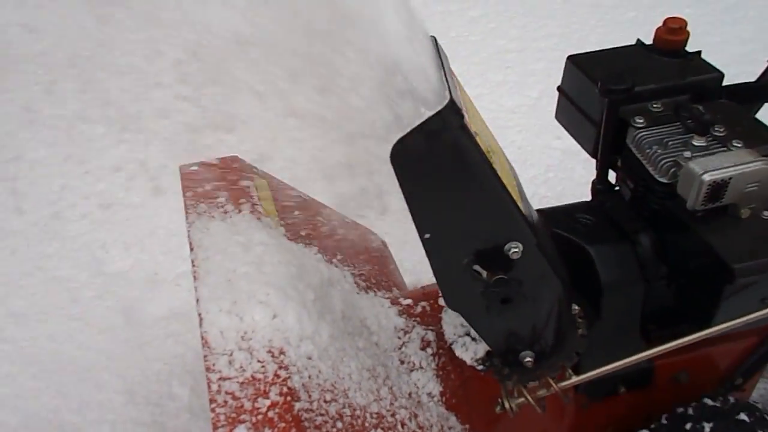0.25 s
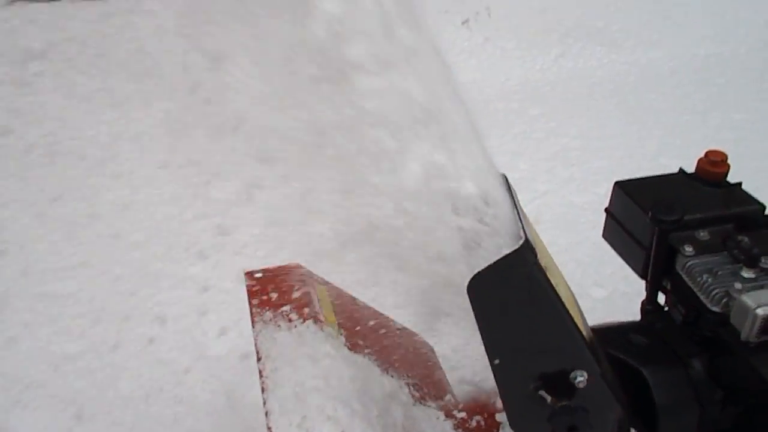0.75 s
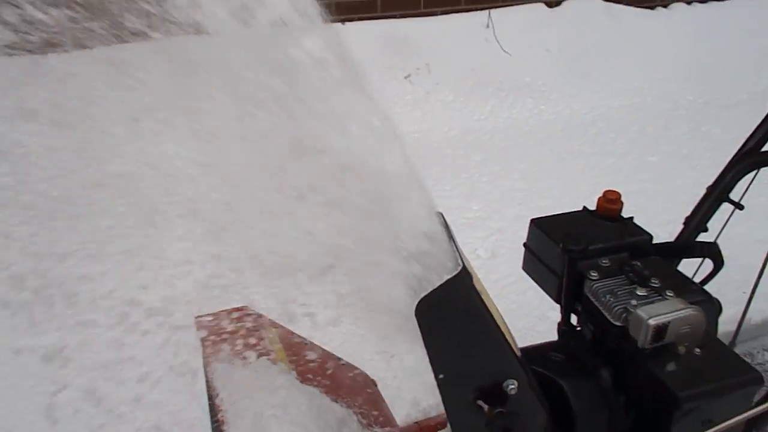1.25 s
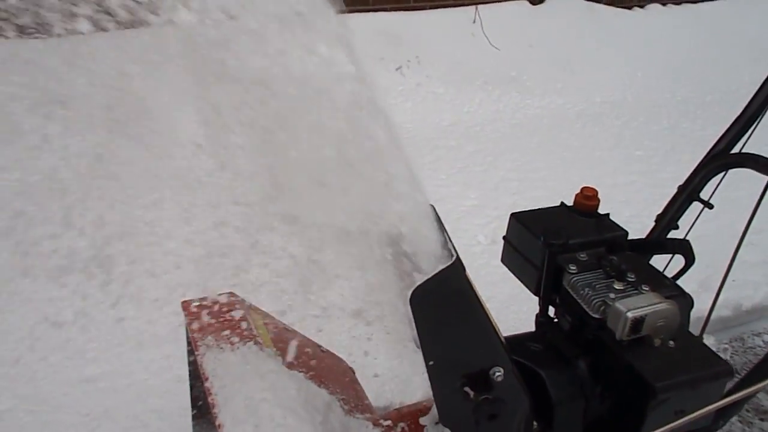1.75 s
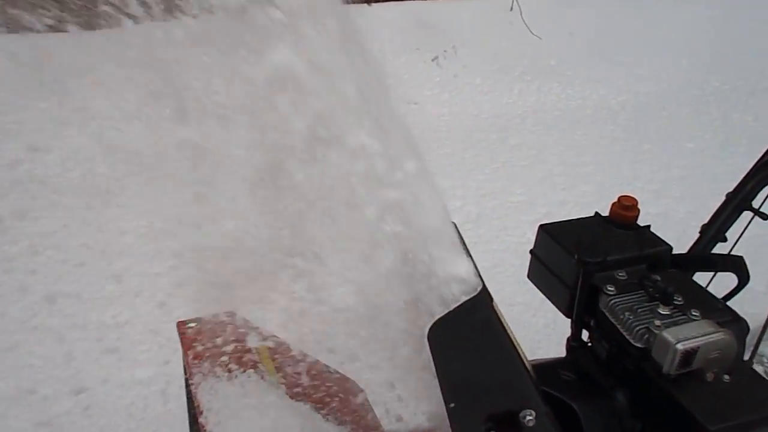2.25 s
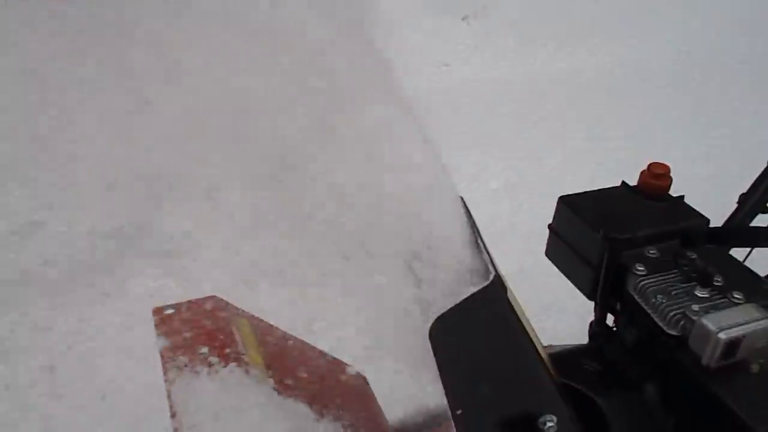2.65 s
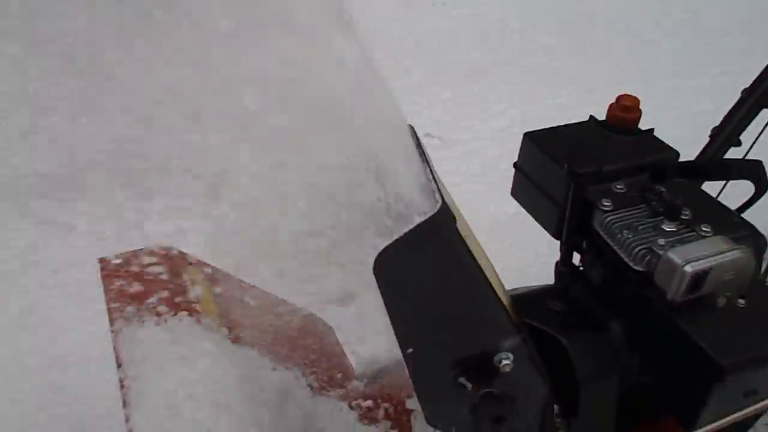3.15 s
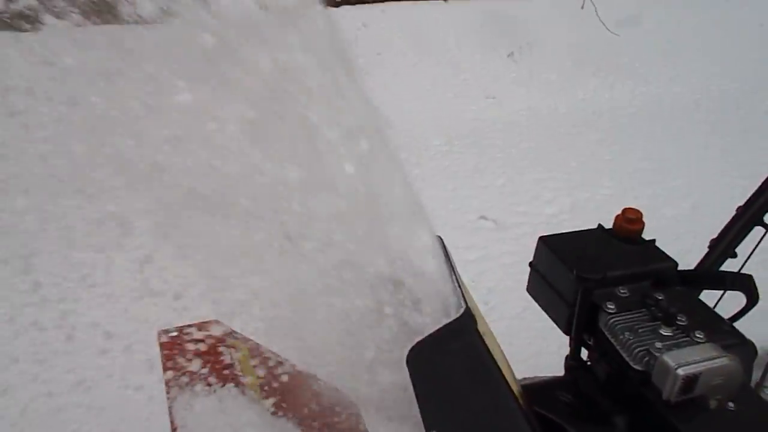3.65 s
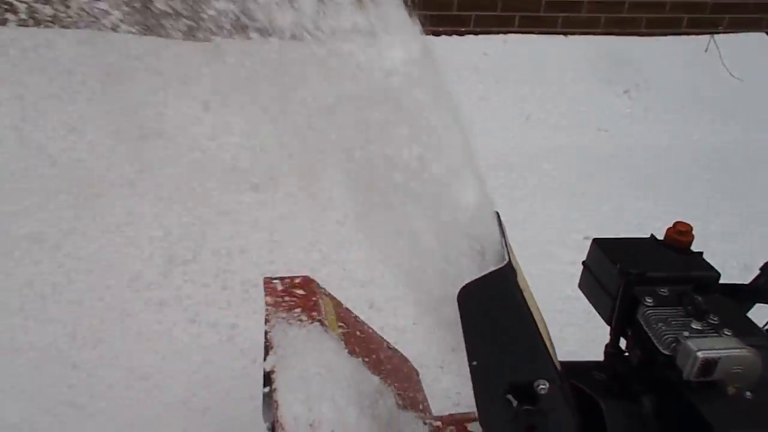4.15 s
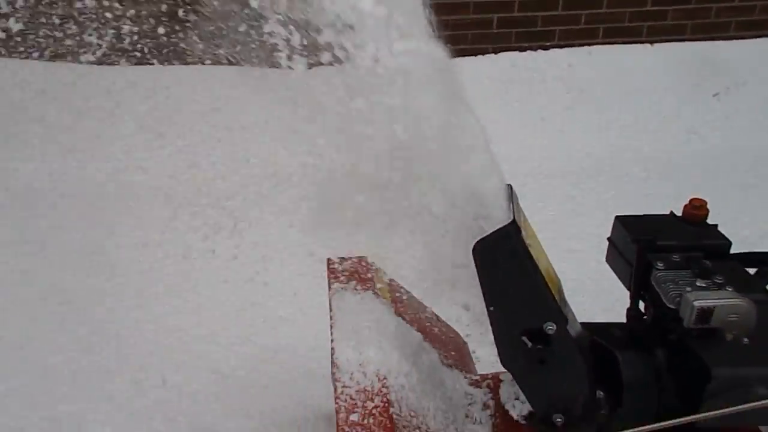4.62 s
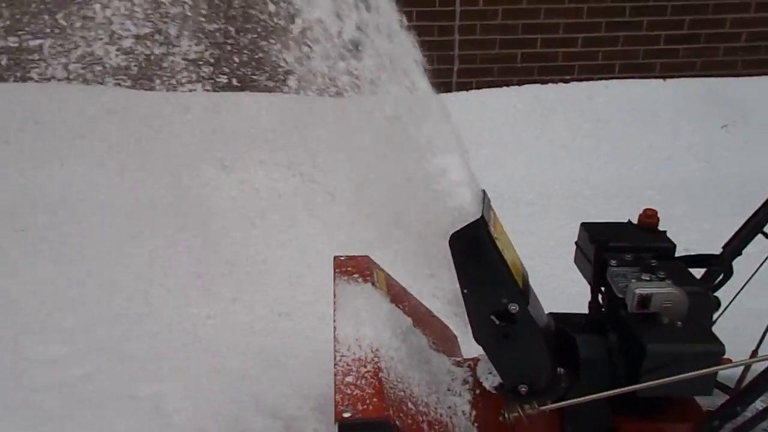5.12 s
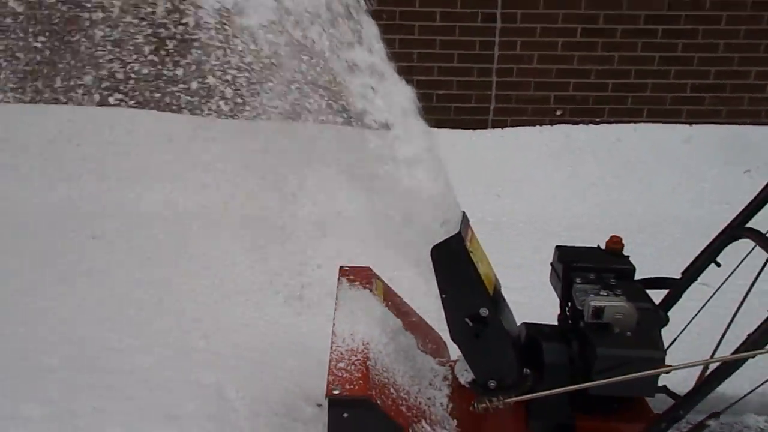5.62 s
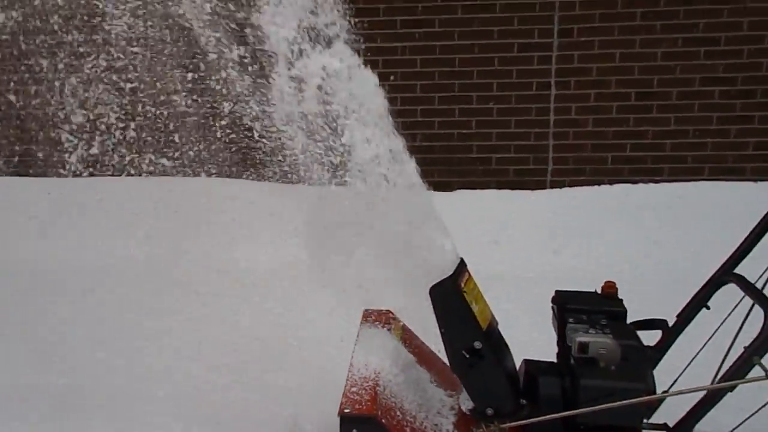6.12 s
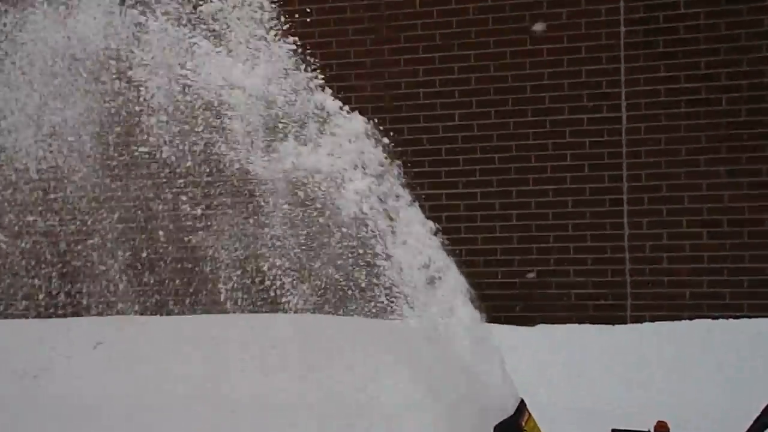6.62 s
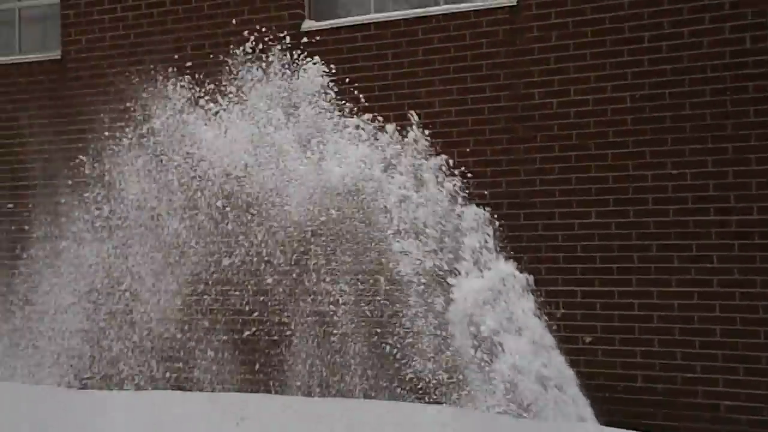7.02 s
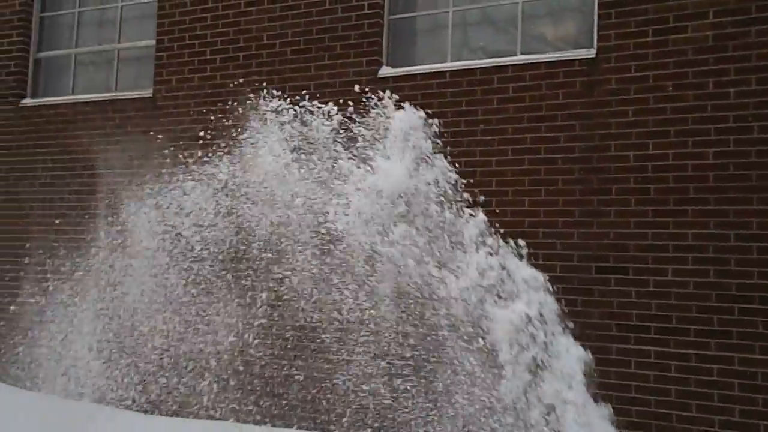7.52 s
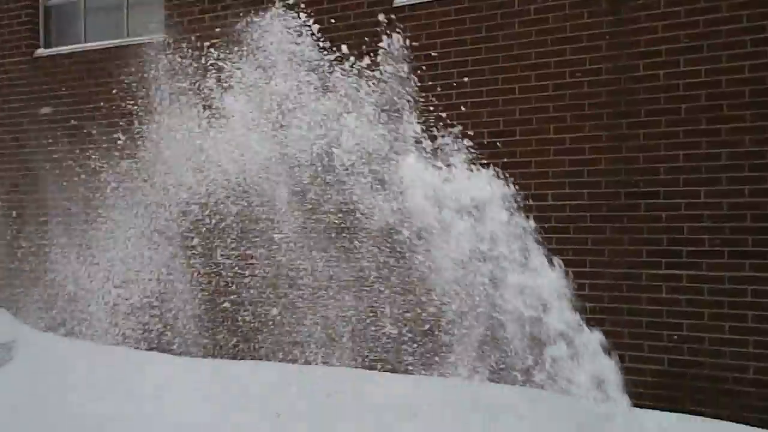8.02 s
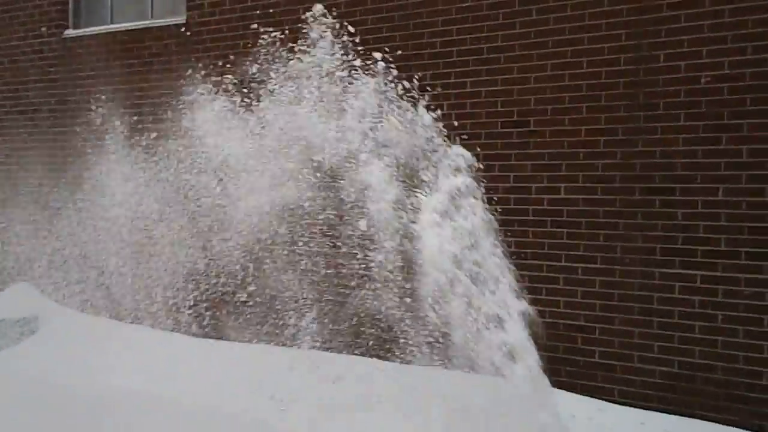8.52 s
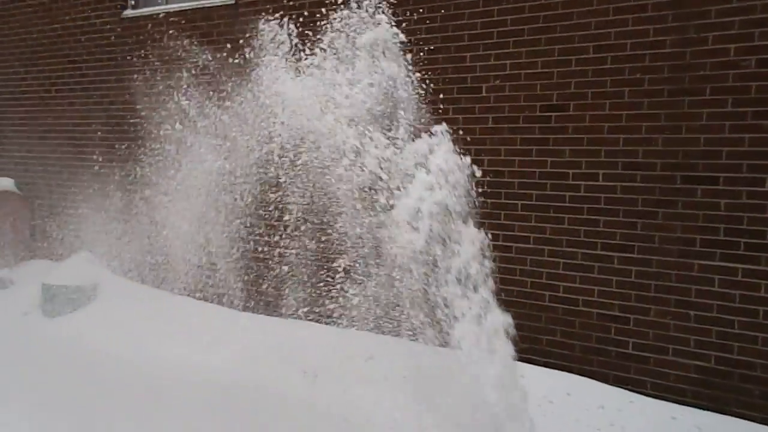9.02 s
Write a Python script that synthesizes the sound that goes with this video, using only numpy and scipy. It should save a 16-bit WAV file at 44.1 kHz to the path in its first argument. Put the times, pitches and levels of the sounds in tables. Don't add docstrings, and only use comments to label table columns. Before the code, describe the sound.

From 0 s a snow thrower runs at full work a step or two away outdoors. Its single-cylinder engine beats about 25 times a second, too fast to count, a rattling buzz-like chug of exhaust thumps, valve raps and metal clatter, with a sharp crack at each firing. Low rumble, faint blade thuds and a grainy snow hiss lie beneath. Irregular harder firings distort slightly and duck the level, which creeps back. Around 3 s the cracks bite more; near 3.5 s the engine swells briefly. From 4 to 6.5 s the exhaust gets fuller and boomier, with a short wall echo. Lumps knock the chute at about 5.3 s and 6.6 s. Around 6.8 s the listener faces the wall: sound brightens, coloured by reflections, and snow rush surges near 7.2 s. Strong cracks hit at 7.3 and 7.6 s. Engine and hiss continue, a little softer, to the cut at about 9.3 s.

```python
import sys
import numpy as np
from scipy import signal
from scipy.fft import rfft, irfft
from scipy.io import wavfile

SR = 44100
rng = np.random.default_rng(int(sys.argv[2]) if len(sys.argv) > 2 else 0)


def voltage_ratio(level):
    return 10 ** (np.asarray(level, float) / 20)


def wav_record(signal):
    frames = np.transpose(np.atleast_2d(signal))
    bounded = np.clip(frames, -1, 1)
    quanta = np.round(bounded * 32767).astype(np.int16)
    wavfile.write(sys.argv[1], SR, quanta)


N = 408366


def rms_one(x):
    return x / np.sqrt(np.mean(x ** 2) + 1e-20)


def in_time(rows):
    s, *columns = np.transpose(rows)
    return [np.interp(np.arange(N) / SR, s, column) for column in columns]


def at_times(times, curve):
    return np.interp(times * SR, np.arange(N), curve)


def clicks(times, sizes):
    at = np.round(np.asarray(times) * SR).astype(int)
    inside = (at >= 0) & (at < N)
    return np.bincount(at[inside], np.asarray(sizes)[inside], N) + 1e-18


def ring(x, hz, t60_s):
    r = voltage_ratio(-60 / (t60_s * SR))
    w = 2 * np.pi * hz / SR
    return signal.lfilter([0, np.sin(w)], [1, -2 * r * np.cos(w), r * r], x)


def resonator(hz, width):
    r = np.exp(-np.pi * width / SR)
    w = 2 * np.pi * hz / SR
    return [(1 - r * r) / 2, 0, (r * r - 1) / 2], [1, -2 * r * np.cos(w), r * r]


def resonance(x, hz, width):
    return signal.lfilter(*resonator(hz, width), x)


def smooth(x, ms):
    r = np.exp(-1000 / (max(ms, .05) * SR))
    return signal.lfilter([1 - r], [1, -r], x)


def swell(x, rise_ms, fall_ms):
    envelope = smooth(smooth(x, rise_ms), fall_ms)
    envelope = np.roll(envelope, -int(rise_ms * SR / 1000))
    return envelope * (rise_ms + fall_ms) * SR / 600


def drift(ms):
    return rms_one(smooth(smooth(rng.standard_normal(N), ms), ms))


def coloured(spectrum):
    hz, db = np.transpose(spectrum)
    axis = np.log(np.fft.rfftfreq(N, 1 / SR) + 1)
    gain = voltage_ratio(np.interp(axis, np.log(hz), db))
    return rms_one(irfft(rfft(rng.standard_normal(N)) * gain, N))


def split(x, hz):
    middle = signal.sosfilt(signal.butter(2, hz, fs=SR, output="sos"), x)
    treble = signal.sosfilt(signal.butter(2, hz, "high", fs=SR, output="sos"), x)
    return middle, treble


# (t/s, lag behind an even beat/ms)
GOVERNOR_LAG = [(0, 0), (.85, 1), (1.4, 1), (2.23, .3), (2.6, -.55), (3.34, -1.05), (3.7, -.55),
                (4.72, -.85), (5, .2), (6.38, -.6), (7.4, .75), (8.04, -.6), (8.35, .45), (9.26, 2.4)]
# (t/s, gain lost/dB)
HARD_FIRINGS = [(.334, 8.5), (.373, 11), (.572, 6.5), (.69, 7), (1.402, 5.5), (2.073, 5.5), (2.113, 7),
                (2.271, 6.5), (2.547, 3.5), (2.823, 6.5), (2.902, 5.5), (3.021, 9.5), (3.139, 2.5),
                (3.258, 5), (3.574, 8), (3.772, 7.5), (3.811, 5), (3.93, 7.5), (4.088, 4), (4.128, 7.5),
                (4.641, 5.5), (4.799, 6), (4.919, 3), (5.354, 4), (6.46, 3.5), (7.014, 6.4), (7.528, 8.5),
                (7.962, 4.5), (8.912, 4.5), (9.111, 5.5)]


def firings():
    first_s, cycles_per_s = .05701, 25.3
    even = first_s + np.arange(-1, 236) / cycles_per_s
    times = even + np.interp(even, *np.transpose(GOVERNOR_LAG)) / 1000
    hard = np.zeros(len(times))
    nearest = [np.argmin(abs(times - s)) for s, db in HARD_FIRINGS]
    hard[nearest] = np.array(HARD_FIRINGS)[:, 1]
    return times, hard


def pulses(table, times, hard, behind, spread_db, jitter_ms, hard_share=0.043):
    out = np.zeros(N)
    moved = at_times(times, behind)
    for ms, hz, t60_ms, side, rear in table:
        chance = rng.standard_normal((len(times), 2))
        at = times + (ms + jitter_ms * chance[:, 1]) / 1000
        db = spread_db * chance[:, 0] + hard_share * hard * (abs(ms) < 2)
        push = side + (rear - side) * moved
        out += ring(clicks(at, push * voltage_ratio(db)), hz, t60_ms / 1000)
    return rms_one(smooth(out, .08))


# (t from firing/ms, f/Hz, t60/ms, push from the side, push from behind)
VALVE_RAPS = [(-18.5, 1190, 2.5, 7.5, -1), (-12, 1410, 14, .3, 4), (-10, 1560, 39, 0.45, -3.3),
              (-4, 2380, 3.8, 0.89, 7), (0.3, 1360, 2.7, 1.4, 1.5), (2.66, 1650, 9.6, 5.2, 5.5),
              (0.54, 2580, 6.2, 3, 4.5), (5.5, 2230, 33, 0.98, 4.5)]


def raps(times, hard, behind):
    return pulses(VALVE_RAPS, times, hard, behind, spread_db=2.4, jitter_ms=0.08)


BURST_TIMES = [-20.5, -13.5, -9.5, -4, .4, 9.2, 15]
# (rise/ms, fall/ms, middle level/dB, treble level/dB, level change between cycles/dB)
BURST_SHAPES = [
    (0.75, 3, -10, -8, 1),
    (0.96, 2.7, -2, -3.5, 1),
    (1.03, 2.5, -6.5, 1, 1.5),
    (0.9, 2.5, -4, -9, 1),
    (0.6, 1.25, 8.5, 12, .7),
    (1.6, 1.2, -4, .5, 3),
    (0.95, 1, -12, -14, 3),
]
# (f/Hz, level per Hz/dB)
NOISE_COLOUR = [(350, -14), (600, -9), (679, -5.5), (958, -9.5), (1100, -4.5), (1200, -8), (1630, -6),
                (1750, -6.5), (2160, -4.5), (3200, -4.5), (7040, -3), (9940, -9.5), (11400, -8.5),
                (14800, -49), (22000, -120)]
# (f/Hz, width/Hz, level/dB)
PANELS = [(1106, 11, 8), (1660, 9, 6.5), (2220, 40, 5), (4910, 840, 3.5), (8060, 270, -2), (6930, 1300, -3)]


def clatter(times, hard, bite_db, jitter_ms=.3, hard_share=.22, grain_db=1.6):
    middle_gate, treble_gate = np.zeros(N), np.zeros(N)
    for ms, (rise, fall, middle_db, treble_db, spread_db) in zip(BURST_TIMES, BURST_SHAPES):
        chance = rng.standard_normal((len(times), 3))
        firing_db = (hard_share * hard + bite_db) * (abs(ms) < 2)
        db = spread_db * chance[:, 0] + firing_db
        at = times + (ms + jitter_ms * rise * chance[:, 1]) / 1000
        middle_gate += swell(clicks(at, voltage_ratio(db + middle_db)), rise, fall)
        treble_gate += swell(clicks(at, voltage_ratio(db + treble_db + .8 * chance[:, 2])), rise, fall)
    middle, treble = split(coloured(NOISE_COLOUR) * voltage_ratio(grain_db * drift(0.21)), 5205)
    noise = middle * middle_gate + treble * treble_gate
    panels = sum(voltage_ratio(db) * resonance(noise, hz, width) for hz, width, db in PANELS)
    return rms_one(noise + panels)


# (t from firing/ms, f/Hz, t60/ms, push from the side, push from behind)
GAS_PULSES = [(-14.6, 330, 8, -.5, -.3), (-13.4, 520, 9, 1.9, 1.9), (-12.4, 600, 5, -1.7, -2.2),
              (-10.45, 560, 13, 2.1, -1.2), (-8.3, 520, 12, .5, .6), (-2.5, 480, 9, 1.7, 1.2),
              (-.45, 520, 8, 3.7, 3.4), (0, 430, 8, 0, 2.2), (.7, 270, 23, -3.4, -1.9),
              (.5, 175, 40, 0, -.9), (11, 520, 14, .6, .3), (19.5, 420, 12, .5, .5)]


def exhaust(times, hard, behind):
    return pulses(GAS_PULSES, times, hard, behind, spread_db=1.3, jitter_ms=.06)


# (f/Hz, level per Hz/dB)
RUMBLE_COLOUR = [(15, -59), (25, -29), (60, -30), (119, 1), (292, 3.5), (557, -28.5), (628, 2), (900, -4),
                 (1170, -36), (1980, -120)]


def rumble():
    return coloured(RUMBLE_COLOUR)


def snow(patchy_db=2.18, grain_db=1.5):
    hiss = coloured(NOISE_COLOUR) * voltage_ratio(patchy_db * drift(4.4) + grain_db * drift(0.81))
    panels = sum(voltage_ratio(db - 9.5) * resonance(hiss, hz, width) for hz, width, db in PANELS)
    return rms_one(hiss + panels)


def boom(times):
    hz, t60_s = 118.6, 0.15
    once = ring(clicks(times, np.ones(len(times))), hz, t60_s)
    return rms_one(ring(once, hz, t60_s))


def impeller():
    start_s, blades_per_s = .033, 50.31
    times = start_s + np.arange(470) / blades_per_s
    strength = voltage_ratio(3.6 * rng.standard_normal(len(times)))
    return rms_one(ring(clicks(times, strength), 760, 0.0019))


def echo(x, delay_ms):
    return np.interp(np.arange(N) - delay_ms * SR / 1000, np.arange(N), smooth(x, 0.022))


# (t/s, peak level/dB, gain lost/dB)
LUMPS = [(1.834, 2, -3), (1.838, 1, 1), (5.2502, 11, 4), (5.287, 7.5, 14), (6.548, -3, 1.5),
         (6.6435, 4.5, 7), (6.688, 7, 11), (7.0064, 6, 4), (7.26, -1, 1), (7.289, 8.5, 7.5), (7.341, 4, 1),
         (7.3605, 2, -2), (7.5575, 16, 14), (7.6158, 13, 8)]


def knocks():
    s, db, lost = np.transpose(LUMPS)
    envelope = swell(clicks(s + 0.00022, voltage_ratio(db - 11.5)), 0.99, 2.3)
    return envelope * split(coloured(NOISE_COLOUR), 4600)[1]


# (f/Hz, width/Hz, depth 0-1)
CANCELLED = [(2010, 600, .8), (4400, 1400, .68)]
# (t/s, frequency ratio)
CANCELLED_SLIDE = [(6.8, 1.21), (7.15, 1.057), (7.7, 1.03), (8.3, 1), (8.8, 0.98), (9.26, .97)]
# (f/Hz, width/Hz, gain)
REINFORCED = [(1540, 190, -0.54), (5360, 1070, 0.41), (7900, 3500, -0.53)]


def wall(x, turned, size=256):
    for hz, width, depth in CANCELLED:
        band, state = np.zeros(N), np.zeros(2)
        for i in range(np.argmax(turned > 0), N, size):
            ratio = np.interp(i / SR, *np.transpose(CANCELLED_SLIDE))
            b, a = resonator(hz * ratio, width)
            band[i:i + size], state = signal.lfilter(b, a, x[i:i + size], zi=state)
        x = x - depth * turned * band
    return x + turned * sum(gain * resonance(x, hz, width) for hz, width, gain in REINFORCED)


# (t/s, engine level at the listener/dB, snow level in the chute/dB, firing crack level/dB)
WORKLOAD = [(0, -19.5, -21, 0), (.5, -20.5, -18.5, 0), (1.25, -21.5, -22.5, 0.5), (1.7, -21.5, -21, 1.5),
            (2.4, -21, -21, 0), (2.95, -23.5, -21.5, 4.5), (3.33, -24, -21.5, 3.5),
            (3.47, -17.5, -17, -2.5), (3.75, -22, -20, 0), (4.4, -18, -18, -2.5), (5.2, -20.5, -19, -1),
            (6.1, -20, -17.5, -2), (6.8, -20, -16.5, -5), (7.2, -21, -11, 0.5), (7.75, -23.5, -14, -3),
            (8.3, -23, -15.5, 1.5), (9.26, -25, -15, 0.5)]
# (t/s, wall echo delay/ms, wall echo gain, moved round the exhaust 0-1, turned 0-1)
LISTENER = [
    (0, 45, .05, 0, 0),
    (3.6, 39.6, .1, .05, 0),
    (4.2, 38.2, .22, .15, 0),
    (5.0, 36.6, .3, .4, 0),
    (5.75, 34.9, .32, .65, 0),
    (6.3, 33.2, .32, .7, 0),
    (6.68, 31.8, .32, .85, .05),
    (6.92, 31, .32, 1, 1),
    (9.26, 30.7, .32, 1, 1),
]


def scene():
    engine_db, snow_db, bite_db = in_time(WORKLOAD)
    wall_ms, wall_gain, behind, turned = in_time(LISTENER)
    times, hard = firings()

    gas = exhaust(times, hard, behind)
    bank_echo = 0.33 * behind * echo(gas, 6.2)
    gas = gas - wall_gain * echo(gas, wall_ms) + bank_echo
    low = gas + voltage_ratio(-39) * impeller() + voltage_ratio(-9) * rumble()
    low = voltage_ratio(engine_db + 2.5 * turned) * low

    metal = clatter(times, hard, at_times(times, bite_db)) + voltage_ratio(-10.3) * raps(times, hard, behind)
    metal = voltage_ratio(engine_db + 2.5 + 5.5 * turned) * metal
    high = metal + voltage_ratio(snow_db) * snow() + knocks()

    hollow = voltage_ratio(engine_db - 21.5 + 20 * behind - 8 * turned) * boom(times)
    return (low + hollow + wall(high, np.clip(turned, 0, 1)))[None]


def ducking(x, recover_db_per_s=160, extra_db=2.2, attack_ms=.6, late_ms=2):
    overload_db, lost_per_db, most_lost_db = 1.0, 5, 5.5
    times, hard = firings()
    s, db, lost = np.transpose(LUMPS)
    excess_db = 20 * np.log10(abs(x) + 1e-9) - overload_db
    peaks = np.clip(lost_per_db * excess_db, 0, most_lost_db)
    over = clicks(times + 0.0029, (hard + extra_db) * (hard > 0)) + clicks(s + 0.0023, lost)
    over = np.maximum(over, np.roll(peaks, int(late_ms * SR / 1000)))
    climb = recover_db_per_s * np.arange(N) / SR
    lost_db = np.maximum.accumulate(over + climb) - climb
    return voltage_ratio(-smooth(lost_db, attack_ms))


def top_cut(x):
    return signal.sosfilt(signal.butter(12, 11530, fs=SR, output="sos"), x)


def record(dry):
    x = signal.sosfilt(signal.butter(2, 128, "high", fs=SR, output="sos"), dry)
    x = x - .9 * resonance(x, 7670, 520)
    x = signal.sosfilt(signal.cheby2(10, 62, 12150, fs=SR, output="sos"), x)
    x = x * ducking(x[0])
    ceiling, knee = 0.96, 5
    mix = x / (1 + abs(x / ceiling) ** knee) ** (1 / knee)
    return top_cut(mix)


dry = scene()
out = record(dry)
wav_record(out)
```